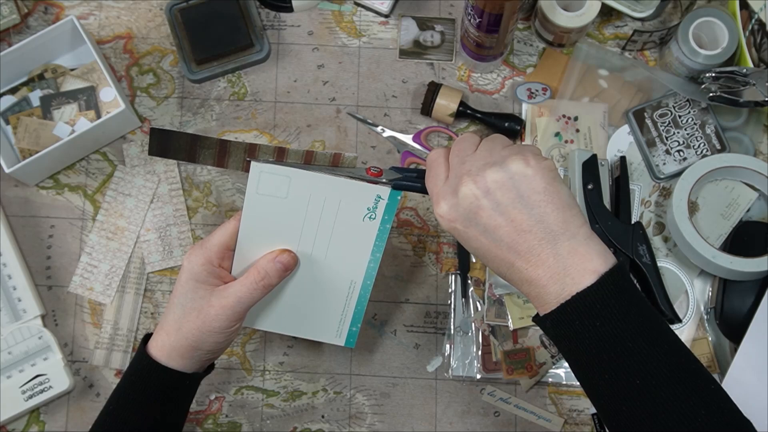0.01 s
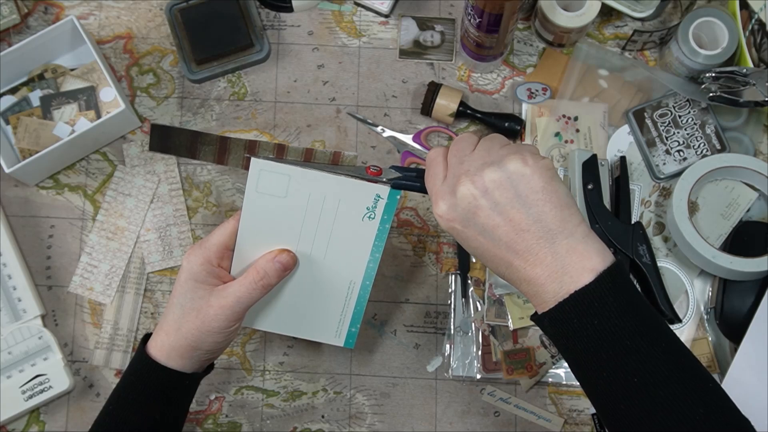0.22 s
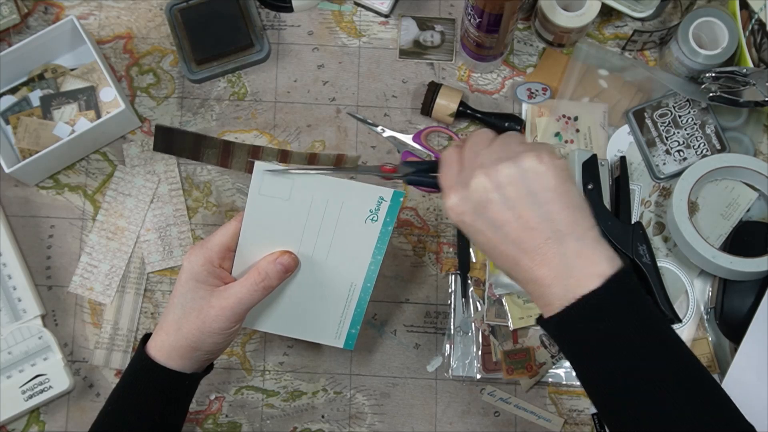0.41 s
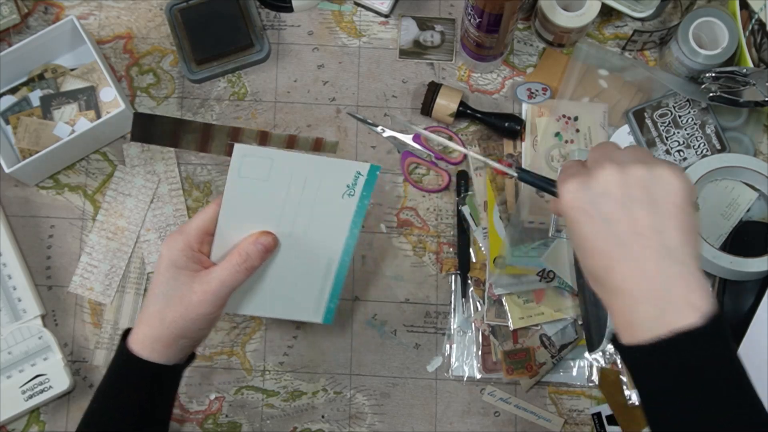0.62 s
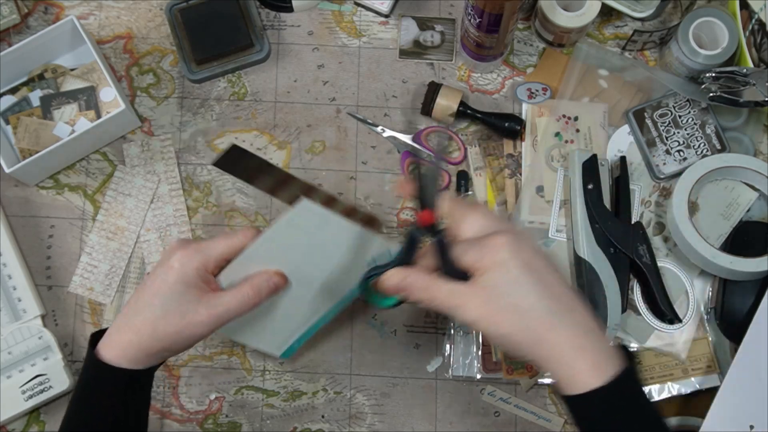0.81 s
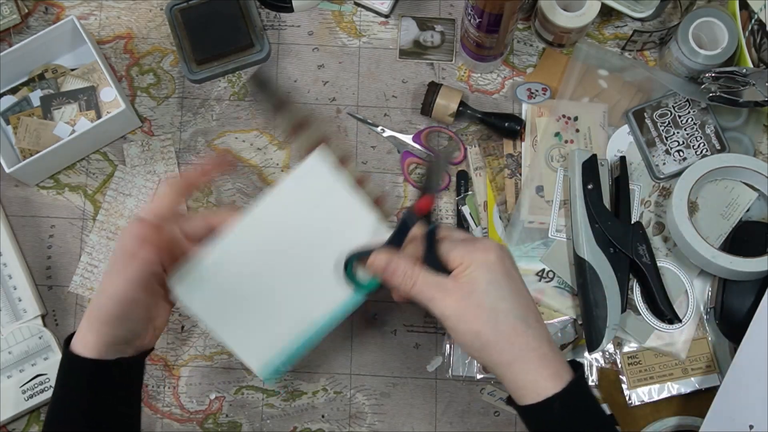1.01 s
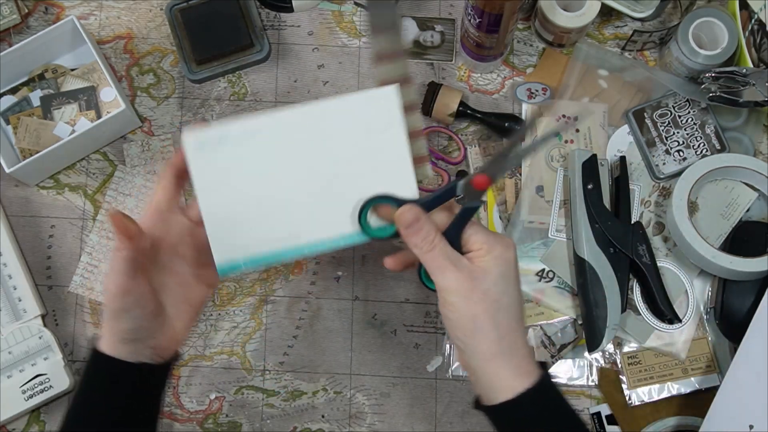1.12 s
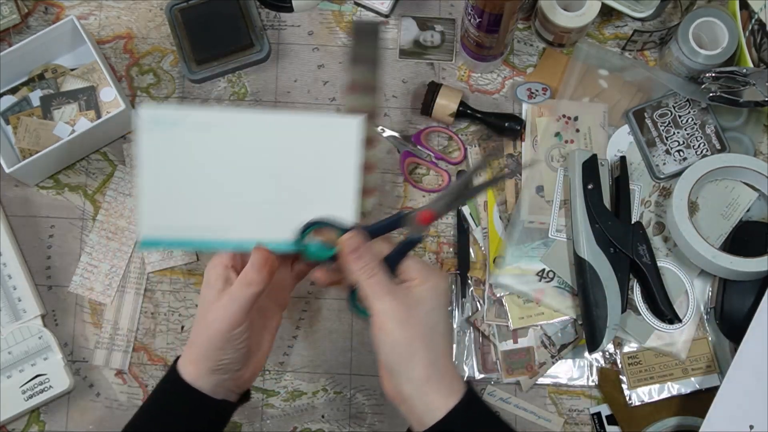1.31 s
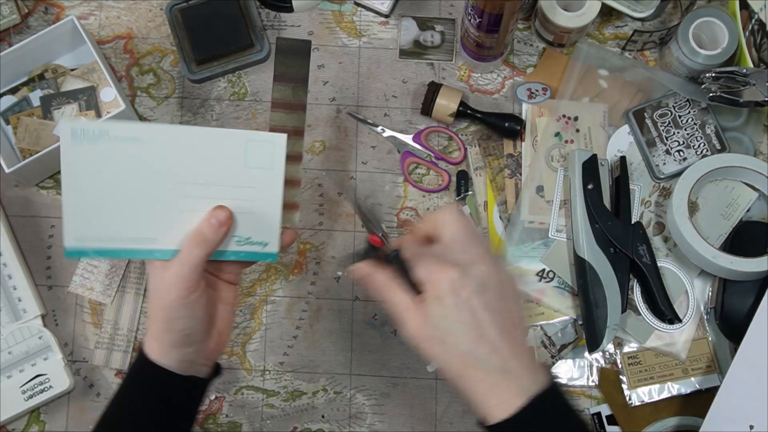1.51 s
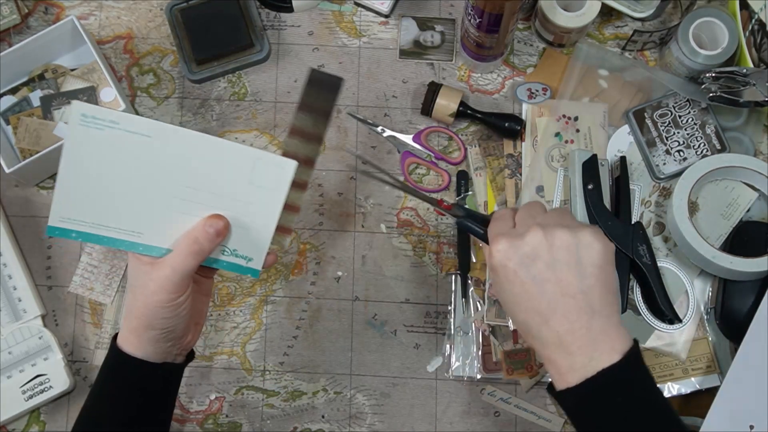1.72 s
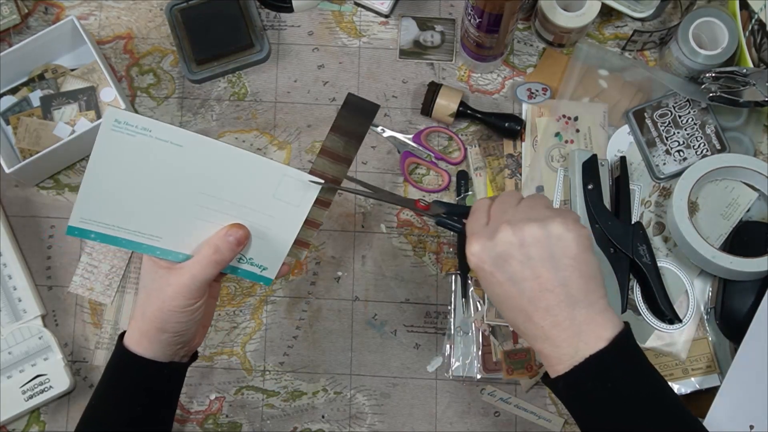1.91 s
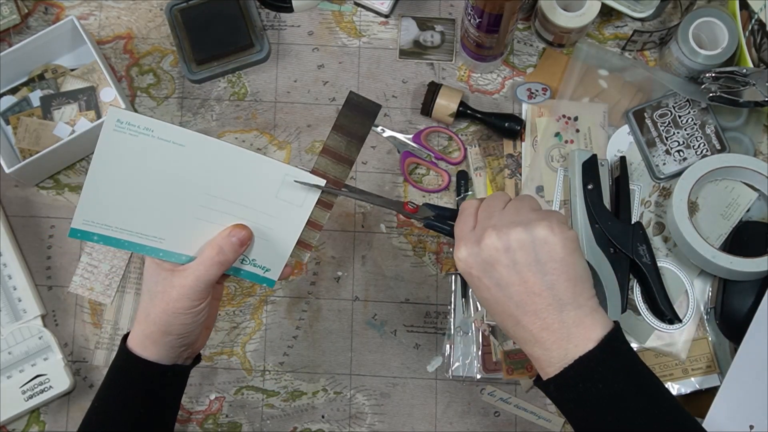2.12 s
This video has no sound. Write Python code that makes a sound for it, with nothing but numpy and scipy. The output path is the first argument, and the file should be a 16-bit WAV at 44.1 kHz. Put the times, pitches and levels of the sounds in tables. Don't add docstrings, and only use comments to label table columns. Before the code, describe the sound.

Scissors snip once through stiff card, blades rub gritty on reopening, then the card is turned and taps

```python
import sys
import numpy as np
from scipy import signal
from scipy.fft import rfft, irfft
from scipy.io import wavfile
from scipy.ndimage import uniform_filter1d

SR = 44100
rng = np.random.default_rng(int(sys.argv[2]) if len(sys.argv) > 2 else 0)


def waveform_to_disk(signal):
    frames = np.transpose(np.atleast_2d(signal))
    scaled = np.clip(frames, -1, 1) * 32767
    samples = np.round(scaled).astype(np.int16)
    wavfile.write(sys.argv[1], SR, samples)


def ratio_of_db(decibels):
    return 10 ** (np.asarray(decibels, float) / 20)


N = 94815
LEFT_RIGHT = np.array([[1], [-1]])


def unit(x):
    return x / np.sqrt(np.mean(x ** 2))


def colour(x, points):
    p = np.array(points, float)
    hz = np.maximum(np.arange(1025) * SR / 2048, 1)
    log_gain = np.interp(np.log(hz), np.log(p[:, 0]), p[:, 1]) * np.log(10) / 20
    cepstrum = irfft(log_gain)
    cepstrum[1:1024] *= 2
    cepstrum[1025:] = 0
    response = irfft(np.exp(rfft(cepstrum)))
    return signal.fftconvolve(x, response)[:len(x)]


def ring(x, hz, width_hz):
    b, a = signal.iirpeak(min(hz, .45 * SR), hz / width_hz, fs=SR)
    return signal.lfilter(b, a, x)


def curve(rows):
    r = np.array(rows, float)
    return ratio_of_db(np.interp(np.arange(N) / SR, r[:, 0], r[:, 1], left=-120, right=-120))


def walk(rate):
    k = int(SR / rate)
    smooth = uniform_filter1d(rng.standard_normal(N), k)
    return unit(uniform_filter1d(smooth, k))


def grit(rate, scatter_db):
    chance, direction, size = rng.random((3, N))
    slips = (chance < rate / SR) * np.sign(direction - .5)
    return unit(slips * ratio_of_db(-scatter_db * np.log(size + .02)))


def burst(shape, z):
    x = z * shape
    for _ in range(6):
        spectrum = rfft(x)
        x = irfft(spectrum / (np.abs(spectrum) + 1e-12), len(x))
        x = x * shape / np.sqrt(uniform_filter1d(x ** 2, size=24) + 1e-12)
    return x


def peak(x):
    return x / np.abs(x).max()


# frequency in Hz, level in dB per Hz.
AIR_TONE = [(15, -45), (25, -26.5), (157, -2), (206, -1.5), (734, -8), (1740, -12.5), (2220, -13),
            (14800, -31), (16000, -38)]
# frequency in Hz, side level relative to the middle in
# dB.
AIR_SIDE_TONE = [(25, -16), (150, -8), (500, -6), (3000, 0.5), (8000, 2), (16000, 3)]


def air():
    level_db, drift_db_per_s, swell_db = -63, -.1, .6
    mid, side = (colour(z, AIR_TONE) for z in rng.standard_normal((2, N)))
    both = mid + colour(side, AIR_SIDE_TONE) * LEFT_RIGHT
    drift_db = drift_db_per_s * (np.arange(N) / SR - 4.0)
    return ratio_of_db(level_db + drift_db + swell_db * walk(1.8)) * unit(both)


TREBLE_HZ = 6350
# frequency in Hz, side level relative to the middle in dB.
ROOM_SIDE_TONE = [(200, -6), (1000, -11), (4000, -6.5), (8000, -0.5), (16000, 2)]


def room(x):
    early_db, early_t60_s, treble_t60_s, gap_s = -7, 0.22, 0.25, 0.0053
    late_db, late_t60_s = -21.5, 0.21
    t = np.arange(int(.7 * SR)) / SR

    def fall(t60):
        return np.exp(-np.log(1000) * t / t60)

    def size(t60):
        return np.sqrt(t60 * SR / np.log(1e6))

    z = rng.standard_normal((2, len(t)))
    low = signal.lfilter(*signal.butter(2, TREBLE_HZ, fs=SR), z)
    early = low * fall(early_t60_s) + (z - low) * fall(treble_t60_s)
    early = ratio_of_db(early_db) * early / size(early_t60_s)
    late = ratio_of_db(late_db) * low * fall(late_t60_s) / size(late_t60_s)
    echo = np.clip(t / gap_s, 0, 1) ** 3 * (early + late)
    mid, side = (signal.fftconvolve(x, h)[:N] for h in echo)
    return mid + colour(side, ROOM_SIDE_TONE) * LEFT_RIGHT


# time in seconds, level in dB.
HANDS_LEVEL = [(0, -54.5), (.06, -65.5), (.3, -66), (.62, -58.5), (.75, -65.5), (.9, -70.5), (1.12, -61.5),
               (1.27, -63.5), (1.47, -61.5), (1.56, -58), (1.7, -62), (1.9, -67), (2.15, -71)]
# frequency in Hz, level in dB.
RUSTLE_TONE = [(200, 0), (600, -7), (1500, 2), (3000, 2.5), (6000, -5), (10000, -13), (16000, -13.5)]


def hands():
    rustle = unit(colour(grit(6000, 2.85), RUSTLE_TONE))
    return curve(HANDS_LEVEL) * ratio_of_db(0.5 * walk(38)) * rustle


# frequency in Hz, level in dB.
METAL_CRACK = [(100, -30), (300, -5), (700, -5.5), (2000, 9), (4000, 12), (6000, -3.5), (9000, -0.5),
               (16000, -2.5)]


def knocks(rows, q, thud_db, thud_hz, crack=METAL_CRACK):
    contact_s, overtone_db = .00015, -16
    out, t = np.zeros(N), np.arange(4096) / SR
    noises = rng.standard_normal((len(rows), len(t)))
    for (start_s, db, hz, ms, crack_db), z in zip(rows, noises):
        contact = np.minimum(t / contact_s, 1) + .9 * (t == 0)
        push = burst(contact * np.exp(-(t * 600 / ms) ** 2), z)
        tone = ring(push, hz, hz / q) + ratio_of_db(overtone_db) * ring(push, 1.95 * hz, hz / q)
        thud = ring(push, thud_hz, thud_hz / 3)
        y = peak(tone) + ratio_of_db(crack_db) * peak(colour(push, crack)) + ratio_of_db(thud_db) * peak(thud)
        i = int(start_s * SR)
        out[i:i + len(t)] += ratio_of_db(db) * peak(y)
    return out


# start in seconds, peak in dB, ring in Hz, length in ms, crack in dB.
TABLE_BUMPS = [
    (.4265, -39, 1300, 5.7, -34),
    (.549, -47, 380, 4.4, -40),
    (.987, -48, 218, 6.5, -40),
    (1.098, -53, 312, 19, -40),
    (1.122, -59, 260, 13, -40),
    (1.17, -58, 340, 22, -40),
    (1.6, -56, 317, 45, -40),
]


def bumps():
    return knocks(TABLE_BUMPS, q=2.8, thud_db=-28, thud_hz=230)


# frequency in Hz, level in dB.
CARD_CRACK_TONE = [(100, -37), (500, -22.5), (1200, 5), (3200, 5), (6500, -0.5), (8500, -13), (10000, -14),
                   (16000, 0)]
# start in seconds, peak in dB, ring in Hz, length in ms, crack in dB.
CARD_TAPS = [(.382, -47.5, 845, 1.6, -22), (.9872, -29, 2500, 1.3, -6), (.9893, -33, 2200, 1.2, -8),
             (1.0138, -38, 2200, 1.2, -3), (1.0195, -49, 3150, 0.76, -16), (1.0265, -41, 3300, 2, -2),
             (1.032, -31, 2500, 1.7, -22), (1.0465, -39, 2230, 1.6, -13), (1.042, -35, 3100, 2.5, -8),
             (1.061, -38.5, 3470, 3.8, -14), (1.097, -47, 1200, 2.8, 6), (1.122, -58, 1300, 2.2, -6),
             (1.184, -43, 3340, 2.8, -4), (1.278, -45, 2500, 1.14, 3), (1.302, -61, 3360, 1.1, -5),
             (1.4255, -32, 2680, .6, -1), (1.4285, -37, 3300, 3, -6), (1.4893, -27, 3200, 1.7, -5),
             (1.4898, -36, 6200, 2.2, -20), (1.5043, -35, 4300, 1, -2), (1.5043, -45, 13000, .8, -20),
             (1.5097, -31, 3310, 3, -2), (1.5105, -36, 6600, 2, -20), (1.5178, -35, 3200, 1.3, -6),
             (1.5205, -32.5, 6400, 2.9, 2), (1.521, -50, 3300, 2.5, 7)]


def taps():
    return knocks(CARD_TAPS, q=4.5, thud_db=-9, thud_hz=1150, crack=CARD_CRACK_TONE)


# time in seconds, level in dB.
CRUMPLES = [
    [(.9885, -50), (.993, -52), (1.004, -56), (1.01, -64)],
    [(1.491, -48), (1.497, -53), (1.508, -55), (1.514, -48), (1.518, -53), (1.526, -50), (1.54, -53),
     (1.62, -63)],
]


def crumple():
    bend = grit(6000, 2) * ratio_of_db(1.2 * walk(300))
    return sum(curve(c) for c in CRUMPLES) * unit(colour(bend, CARD_CRACK_TONE))


# time in seconds, level in dB.
CARD_SLIDES = [
    [(1.002, -62), (1.008, -54), (1.014, -43.5), (1.045, -50), (1.065, -47), (1.098, -59), (1.106, -74),
     (1.13, -68)],
    [(1.30, -73), (1.304, -59), (1.33, -53), (1.35, -48), (1.40, -49.5), (1.432, -50.5), (1.445, -67),
     (1.47, -75)],
]
# frequency in Hz, level in dB per Hz.
CARD_TONE = [(180, -47), (300, -21), (366, -34), (528, -11), (656, -20), (3190, -9), (4830, -6.5),
             (14500, -7.5), (16000, -9)]
# frequency in Hz, width in Hz, level in dB.
CARD_RESONANCES = [(2020, 420, -8), (2500, 440, -33), (3170, 330, -6), (4130, 950, -11.5)]


def slides():
    slips = grit(9000, 1.8) * ratio_of_db(1.1 * walk(170))
    tone = sum(ratio_of_db(db + 2.5 * walk(90)) * unit(ring(slips, hz, w)) for hz, w, db in CARD_RESONANCES)
    scuff = unit(unit(colour(slips, CARD_TONE)) + tone)
    return sum(curve(c) for c in CARD_SLIDES) * scuff


# time in seconds, level in dB.
EDGE_LEVEL = [(.43, -66), (.45, -60), (.475, -56), (.484, -61), (.492, -49), (.499, -62), (.514, -62),
              (.518, -54), (.527, -53), (.543, -58), (.548, -75)]
# frequency in Hz, level in dB.
EDGE_COLOUR = [(4000, -11), (7800, -3), (9500, -14), (12300, 1), (14500, -12), (16000, -12)]


def edge_scrape():
    slips = grit(3000, 2) * ratio_of_db(2.5 * walk(150))
    return curve(EDGE_LEVEL) * unit(colour(slips, EDGE_COLOUR))


# start in seconds, peak in dB, ring in Hz, length in ms, crack in dB.
SQUEAK_ROWS = [(.498, -41, 4350, 9, -25), (.514, -42, 4250, 5, -25), (.5742, -43, 4400, 6, -14),
               (.576, -43, 3600, 5, -25), (.583, -39, 3600, 6, -25), (.5835, -39, 4400, 6, -25),
               (.594, -41, 4500, 5, -25), (.6008, -32, 4420, 5, -22), (.614, -47, 4400, 3, -25),
               (.0325, -41, 4450, 4, -10), (.9615, -46, 2330, 7, -15), (.962, -49, 3600, 9, -20),
               (.413, -48, 490, 12, -40), (.427, -45, 494, 10, -40), (1.4895, -43, 1100, 3, -40)]


def squeaks():
    return knocks(SQUEAK_ROWS, q=22, thud_db=-32, thud_hz=660)


# start in seconds, peak in dB, ring in Hz, length in ms, crack in dB.
BLADE_TICKS = [(.3875, -48.5, 2660, 0.91, 7), (.409, -33, 2770, 2.1, 4), (.415, -28, 3200, 2, -7),
               (.4268, -21, 3350, 1.6, 0), (.4268, -33, 10500, 1, -20), (.4355, -33, 3500, 1.2, -10),
               (.5262, -48, 12600, 2, 7), (.5385, -36, 2840, 1.9, -8), (.5482, -36.5, 3700, 1.92, -14),
               (.5345, -40, 3820, 4.5, -3), (.5937, -33.5, 6700, 3, 3.5), (.628, -46, 3430, 1.7, 8),
               (.653, -60, 4500, 1.7, 0)]


def ticks():
    return knocks(BLADE_TICKS, q=6.7, thud_db=-14.5, thud_hz=502)


# frequency in Hz, width in Hz, level in dB.
RUB_RESONANCES = [(496.7, 110, -35), (1300, 870, 2.5), (2500, 180, 2), (3270, 130, 0), (3600, 95, -4),
                  (6400, 2800, -4), (9600, 2200, -7.5), (11000, 4700, -13), (4340, 410, -10)]
# time in seconds, level in dB.
RUB_LEVEL = [(.409, -55), (.414, -41.5), (.44, -46), (.46, -56), (.49, -57), (.507, -71), (.528, -51),
             (.545, -57), (.56, -70)]
# time in seconds, level in dB.
RUB_END_LEVEL = [(.572, -70), (.576, -53), (.591, -57), (.594, -44), (.603, -46), (.608, -60), (.66, -66),
                 (.93, -75.5)]
# time in seconds, level in dB.
SING_LEVEL = [(.41, -65), (.435, -50), (.47, -56), (.503, -59), (.525, -64), (.565, -57), (.572, -91)]


def rub():
    patch_db, sing_hz, sing_width_hz = 2.5, 4410, 220
    slips = grit(4000, 3)
    tone = sum(ratio_of_db(db + patch_db * walk(70)) * unit(ring(slips, hz, w)) for hz, w, db in RUB_RESONANCES)
    hiss = ratio_of_db(-6 + patch_db * walk(100)) * unit(colour(slips, METAL_CRACK))
    drag = unit(tone + hiss)
    light = signal.lfilter(*signal.butter(3, 6200, "high", fs=SR), drag)
    sing = ring(slips * ratio_of_db(4.5 * walk(140)), sing_hz, sing_width_hz)
    sing = unit(ring(sing, sing_hz, 3 * sing_width_hz))
    return curve(RUB_LEVEL) * drag + curve(RUB_END_LEVEL) * light + curve(SING_LEVEL) * sing


# frequency in Hz, level in dB, time to fall 60 dB in seconds.
BLADE_MODES = [(994, 1, 0.044), (1570, -11, 0.043), (1975, -4, 0.097), (2600, 2, 0.037), (2860, 3.5, 0.02),
               (3780, 4, 0.024), (4010, 6, 0.041), (4350, 7, 0.033), (4700, -3, 0.038), (5340, -20, 0.02),
               (6550, -1, 0.0031), (7900, -4.5, 0.0027), (500, -4, 0.071)]
# delay in seconds, level in dB.
SNIP_ECHOES = [
    (.0085, -12),
    (0.0117, -15),
    (.0175, -22),
]


def snip():
    start_s, rise_s, cut_s, level_db, crack_db = .2003, 0.00349, 0.0031, -16.5, -8.5
    t = np.arange(4096) / SR
    shape = np.minimum(t / rise_s, np.exp(-(t - rise_s) / cut_s))
    tear = burst(shape, rng.standard_normal(len(t)))
    tear = tear + sum(ratio_of_db(db) * np.roll(tear * (t > .002), int(s * SR)) for s, db in SNIP_ECHOES)
    blades = sum(ratio_of_db(db) * np.sqrt(hz * t60) * ring(tear, hz, 5.2 / t60) for hz, db, t60 in BLADE_MODES)
    crack = colour(tear, METAL_CRACK)
    out, i = np.zeros(N), int(start_s * SR)
    out[i:i + len(t)] = ratio_of_db(level_db) * (peak(blades) + ratio_of_db(crack_db) * peak(crack))
    return out


def scene():
    card = bumps() + taps() + crumple() + slides()
    scissors = edge_scrape() + squeaks() + ticks() + rub() + snip()
    dry = hands() + card + scissors
    ports = ratio_of_db(-11) * np.gradient(dry) * LEFT_RIGHT
    high = signal.lfilter(*signal.butter(2, TREBLE_HZ, "high", fs=SR), dry)
    ports = ports + (ratio_of_db(1.1 * LEFT_RIGHT) - 1) * high
    return dry + ports + room(dry) + air()


def low_pass(x):
    return signal.sosfilt(signal.butter(12, 16850, fs=SR, output="sos"), x)


def record(dry):
    top = signal.ellip(14, .3, 45, 15880, fs=SR, output="sos")
    low = signal.butter(2, 45, "high", fs=SR, output="sos")
    mix = signal.sosfilt(np.vstack([top, low]), dry)
    return low_pass(mix)


dry = scene()
out = record(dry)
waveform_to_disk(out)
```